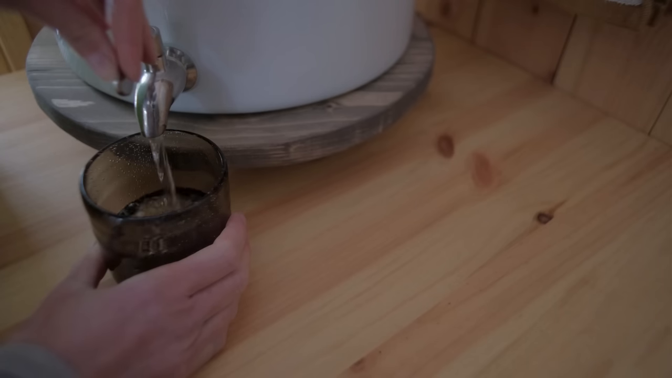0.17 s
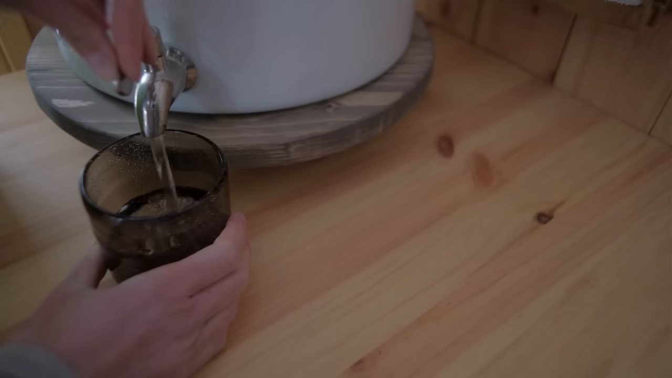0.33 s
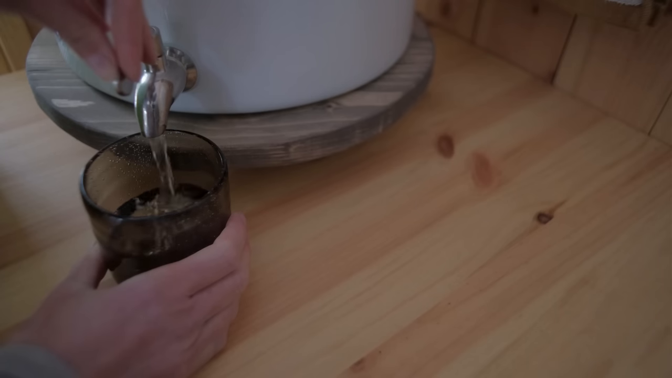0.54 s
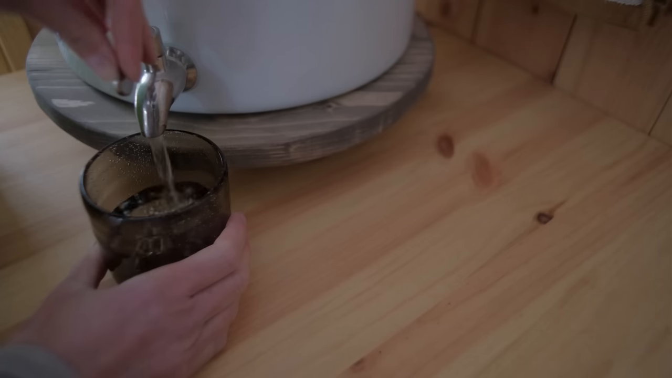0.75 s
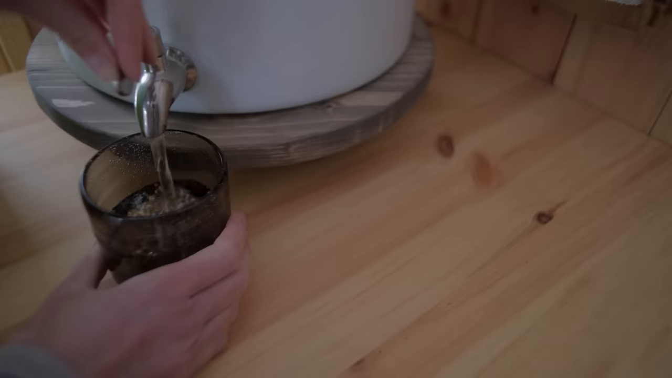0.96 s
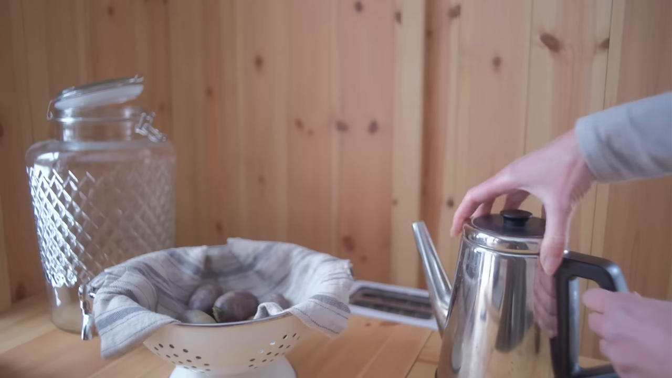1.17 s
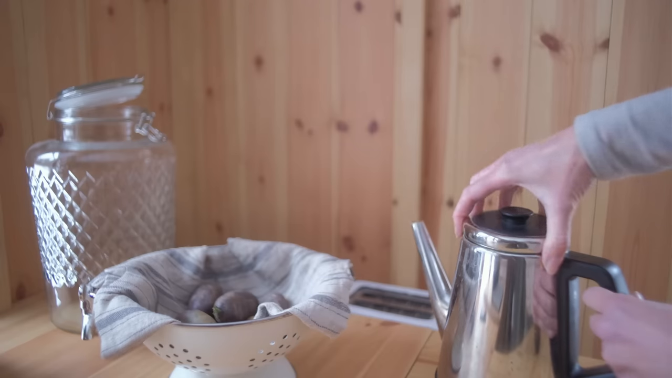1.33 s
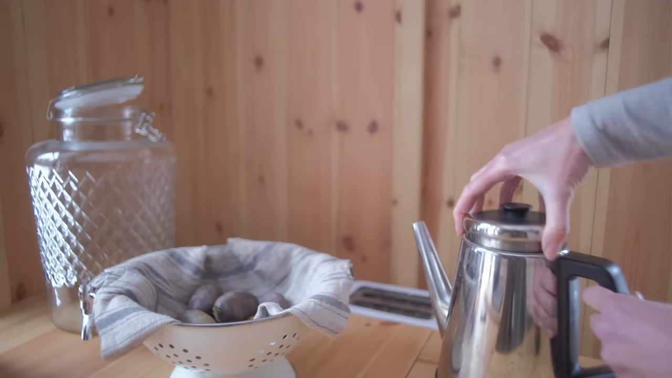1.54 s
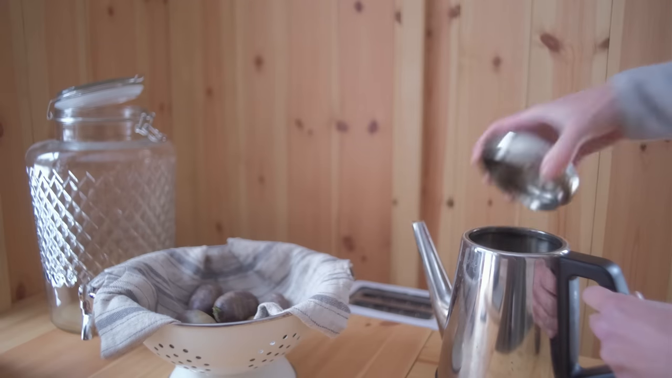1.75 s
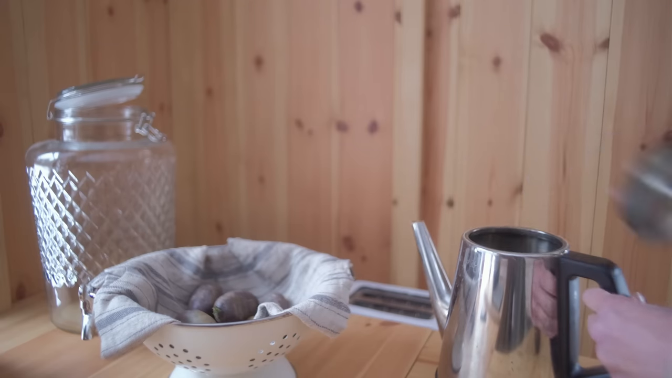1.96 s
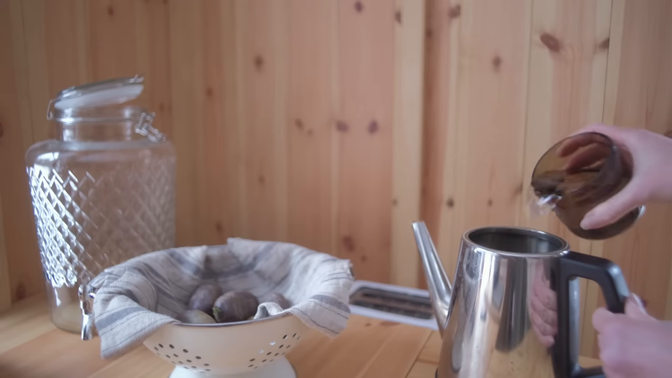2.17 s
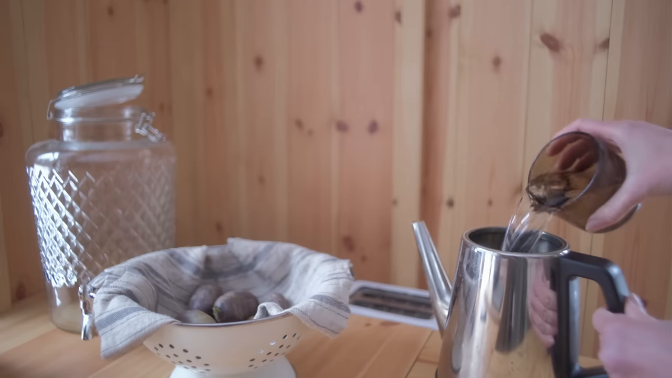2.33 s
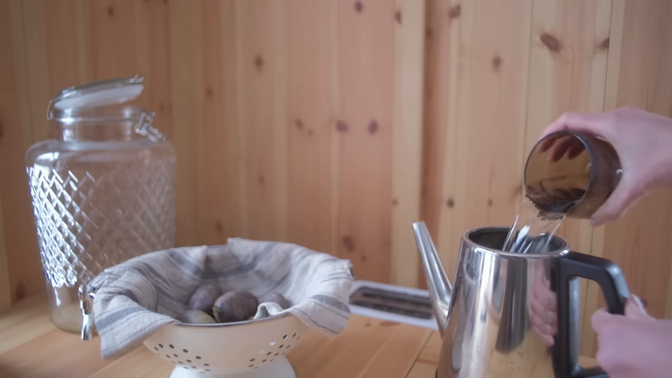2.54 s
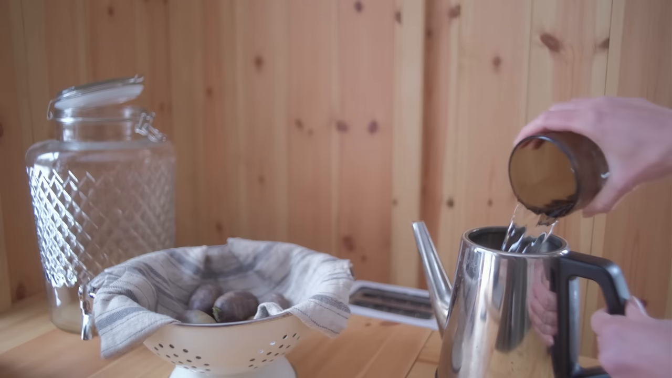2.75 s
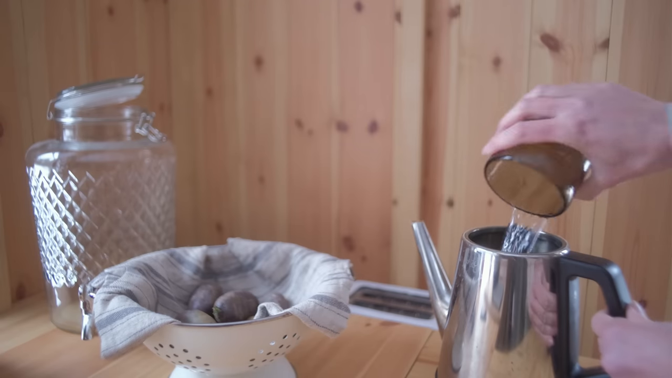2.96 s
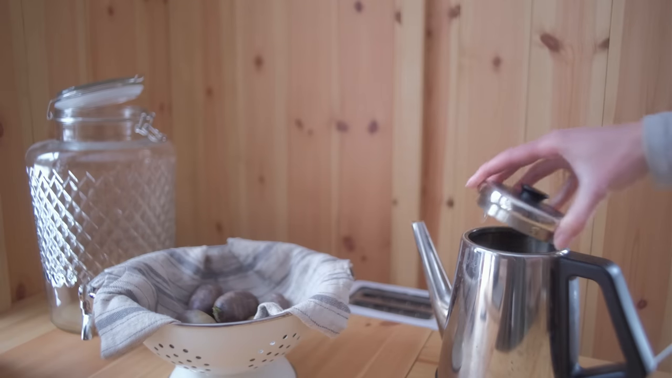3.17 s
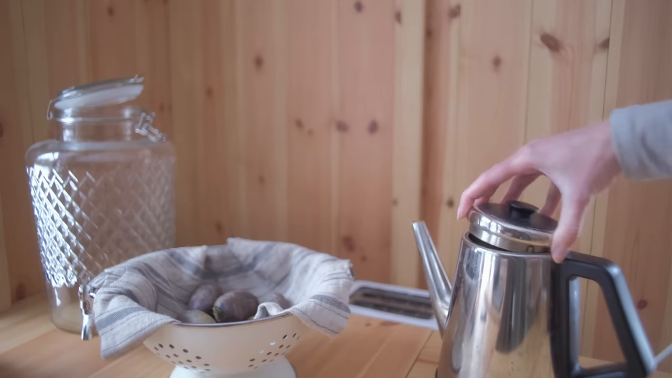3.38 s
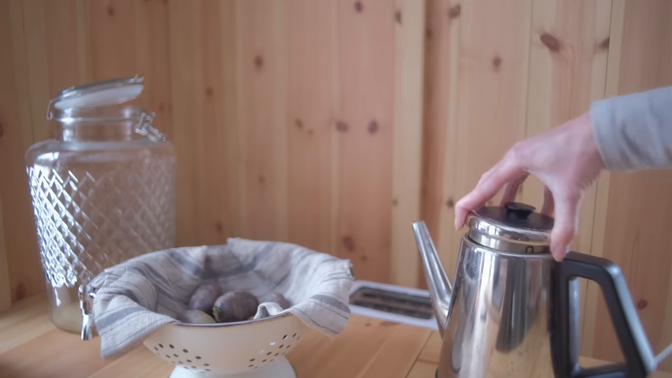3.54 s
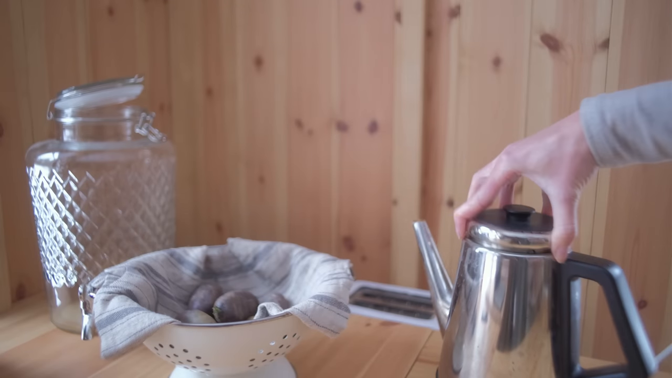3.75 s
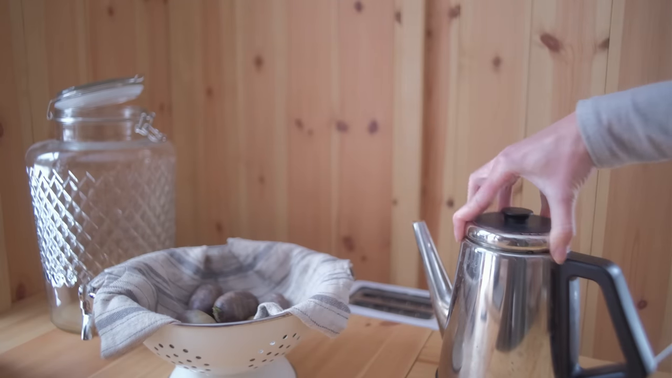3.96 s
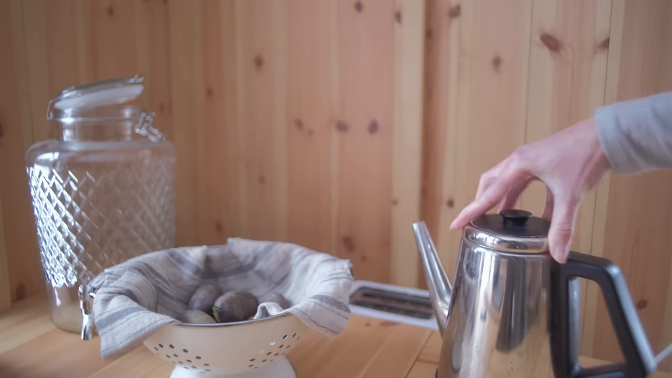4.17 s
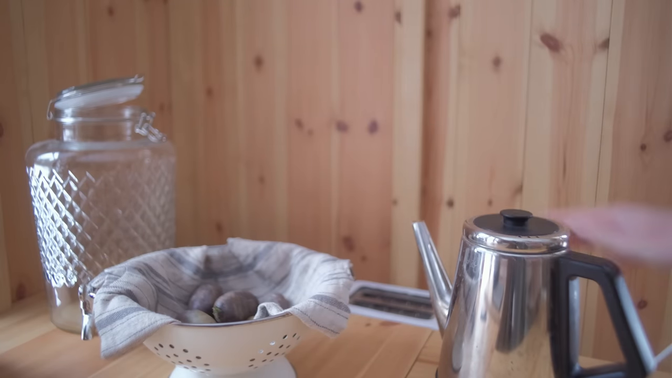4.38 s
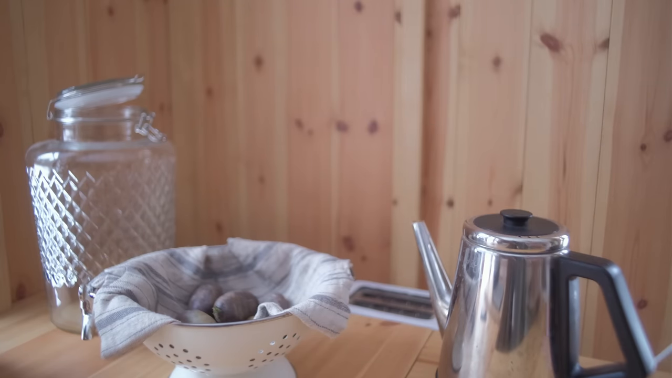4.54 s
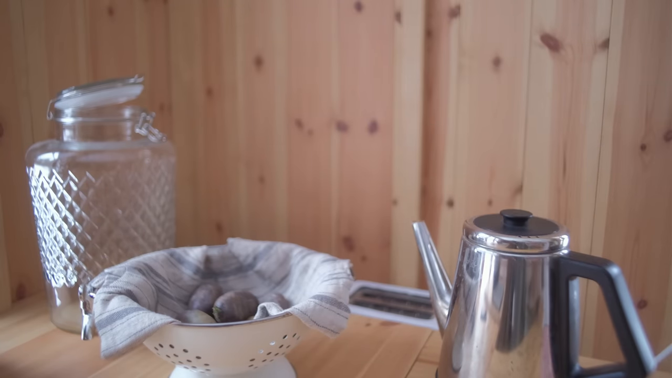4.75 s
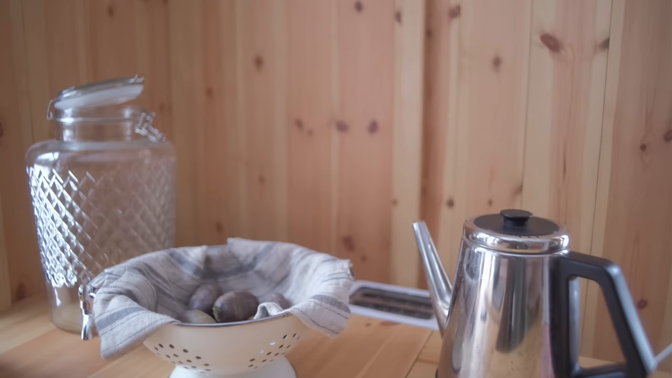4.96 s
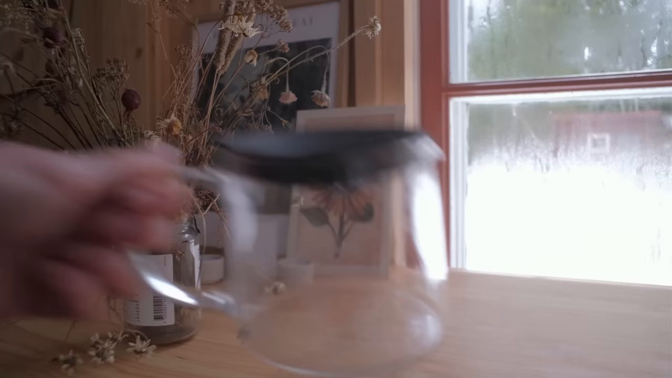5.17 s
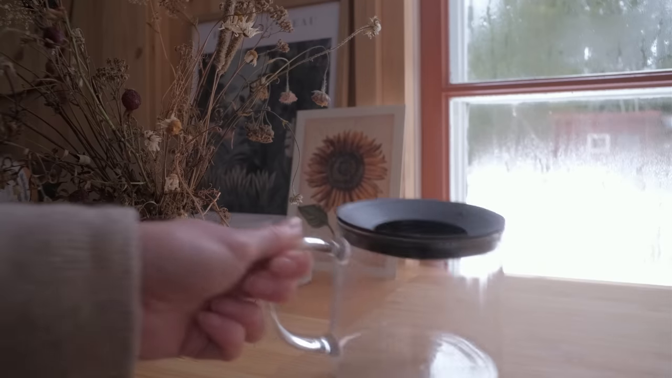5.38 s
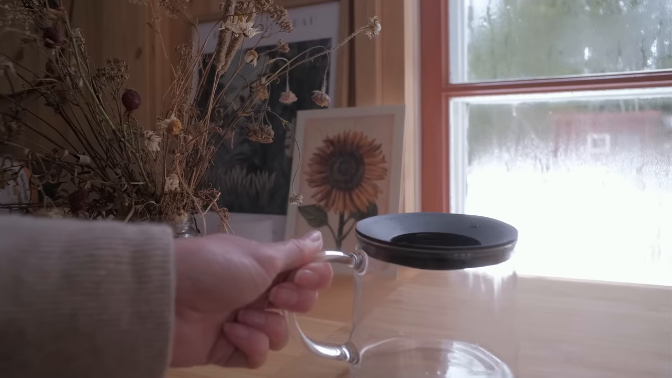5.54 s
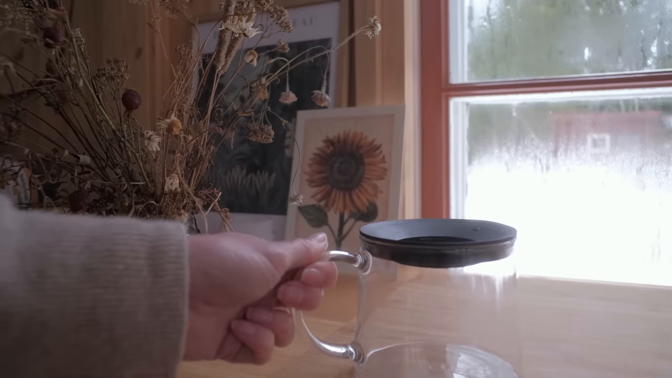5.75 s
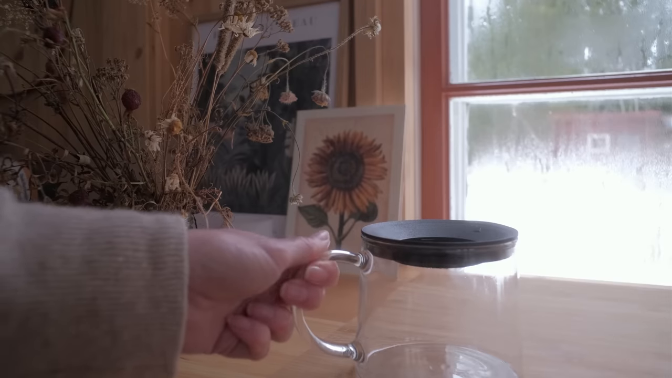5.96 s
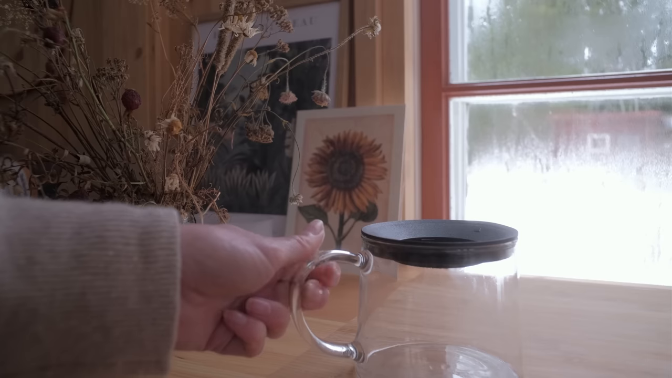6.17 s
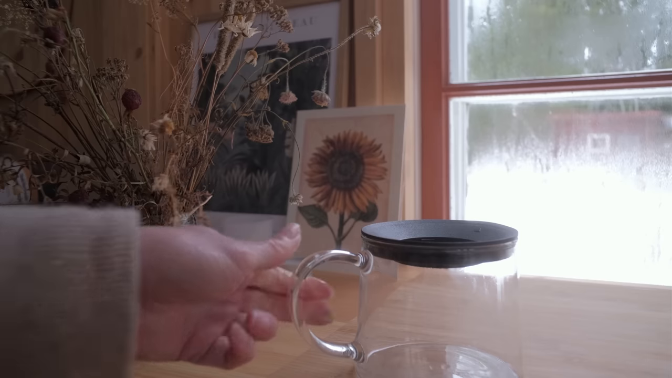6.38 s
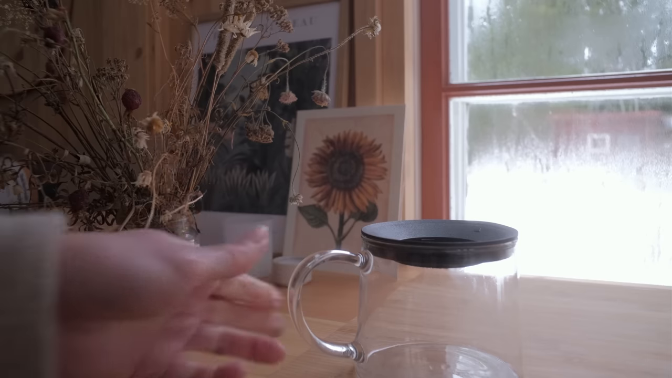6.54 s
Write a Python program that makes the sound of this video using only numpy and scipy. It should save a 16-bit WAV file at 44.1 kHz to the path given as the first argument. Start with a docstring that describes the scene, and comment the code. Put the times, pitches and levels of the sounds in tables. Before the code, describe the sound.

Close kitchen sounds: tap trickle with ringing plops, short pour into a metal kettle, hard lid clank, plastic click, then steady simmering hiss and wooden thud.

```python
"""Four scenes in a wooden kitchen, cut together. First a thin tap stream fills a glass: plops, ringing gurgle, fizz.
Then a steel kettle's lid scrapes off and water is poured in: splash, gulps, an air column rising in pitch.
Then the lid is knocked and pressed back on (struck steel modes, a sinking air note) and a plastic switch snaps.
Last a jug is set down on the wooden top while heating water hisses. Quiet air noise lies under all four."""
import sys
import numpy as np
from scipy import signal
from scipy.fft import rfft, irfft, next_fast_len
from scipy.io import wavfile
from scipy.ndimage import uniform_filter1d

SR = 44100
rng = np.random.default_rng(int(sys.argv[2]) if len(sys.argv) > 2 else 0)


def generate_wav(signal):
    """Clip the signal to [-1, 1] and save it as 16-bit WAV at the path in sys.argv[1]."""
    frames = np.transpose(np.atleast_2d(signal))
    scaled = np.clip(frames, -1, 1) * 32767
    pcm = np.round(scaled).astype(np.int16)
    wavfile.write(sys.argv[1], SR, pcm)


N = 291501

# bubbles in the glass [t/s, level/dB, f/Hz, t60/s]
PLOPS = [(0.014, -23, 664, 0.033), (0.056, -28, 659, 0.12), (0.079, -24.5, 630, 0.062),
         (0.147, -27, 608, 0.043), (0.175, -24, 603, 0.071), (0.199, -30.5, 603, 0.058),
         (0.267, -18, 2290, 0.0083), (0.273, -28, 1480, 0.06), (0.334, -27.5, 572, 0.072),
         (0.367, -21.5, 610, 0.049), (0.394, -19.5, 603, 0.022), (0.445, -24.5, 675, 0.031),
         (0.479, -25.5, 573, 0.086), (0.502, -36, 560, 0.042), (0.539, -33, 1087, 0.15),
         (0.552, -28.5, 584, 0.075), (0.617, -30.5, 1125, 0.053), (0.632, -26.5, 477, 0.033),
         (0.707, -35.5, 1175, 0.14), (0.739, -35, 653, 0.046), (0.779, -22.5, 533, 0.026),
         (0.799, -23, 1260, 0.032), (0.85, -35, 530, 0.071), (0.869, -28.5, 1480, 0.036),
         (0.899, -44, 1350, 0.082), (0.979, -23.5, 603, 0.058), (1.025, -26.5, 1254, 0.075),
         (1.039, -28.5, 1160, 0.082), (1.072, -54, 1240, 0.045)]
# air and wall modes of the glass [f/Hz, base width/Hz, relative level/dB]
GLASS_MODES = [(306, 30, -4.5), (603, 59, -1.5), (1160, 71, -0.5), (1480, 7.5, -8), (1950, 48, -13),
               (3390, 65, -26)]
# fizz spectrum [f/Hz, relative density/dB per Hz]
FIZZ_SPECTRUM = [(59, -48), (100, -2.5), (308, 2), (398, -0.5), (608, 0.5), (836, -53), (1310, 5),
                 (1720, -16), (14400, -39), (16000, -32)]
FIZZ_DB = -47.5
# steady level; kick relative to each plop (gurgle) or drop (small bubbles); decay of the kick
GURGLE_DB, GURGLE_KICK_DB, GURGLE_T60_S = -67, -10.5, 0.11
BUBBLES_DB, BUBBLES_KICK_DB, BUBBLES_T60_S = -56, -14.5, 0.068
STIR_RISE_S = 0.0021


def tap():
    """Plops stir a gurgle that rings the glass; drops stir small bubbles; fizz is dense filtered clicks."""
    out = np.zeros(N)
    size = round(CUTS[1] * SR) + 400
    for t0, *plop in PLOPS:
        add(out, t0, bubble(*plop))

    plop_s, plop_db = np.transpose(PLOPS)[:2]
    drop_s, drop_db = np.transpose(DROPS)[:2]
    gurgle_kicks = swells(plop_s, plop_db + GURGLE_KICK_DB, STIR_RISE_S, GURGLE_T60_S)[:size]
    bubble_kicks = swells(drop_s, drop_db + BUBBLES_KICK_DB, STIR_RISE_S, BUBBLES_T60_S)[:size]
    gurgle_level = amp(GURGLE_DB) + gurgle_kicks
    bubble_level = amp(BUBBLES_DB) + bubble_kicks

    drive = grains(size, 400, 5.6)
    gurgle = np.zeros(size)
    for hz, width_hz, db in GLASS_MODES:
        mode = resonate(resonate(drive, hz, 1.63 * width_hz), hz, 390)
        gurgle += amp(db) * evened(mode)
    add(out, 0, gurgle_level * evened(gurgle))
    add(out, 0, bubble_level * swarm(size, 1185, 5870, 360, cycles=36.5))
    add(out, 0, bubble_level * amp(-26) * swarm(size, 4400, 16400, 200, cycles=36.0, count=12))
    add(out, 0, amp(FIZZ_DB) * colour(grains(size, 6000, 2.4), FIZZ_SPECTRUM))
    return out


# flow from glass into kettle [t/s, splash level/dB]
FLOW = [(2.35, -80), (2.362, -50), (2.41, -37), (2.478, -50), (2.644, -55.5), (2.70, -51.5), (2.80, -47),
        (2.85, -56.5), (2.91, -45), (3.04, -57.5)]
# gulps of the poured water [t/s, level/dB, f/Hz, t60/s]
GULPS = [(2.4, -24.5, 518, 0.22), (2.414, -26, 526, 0.089), (2.408, -24.5, 1753, 0.06),
         (2.462, -35, 1800, .04), (2.534, -27.5, 510, 0.071), (2.659, -33, 3140, 0.023),
         (2.691, -30.5, 2640, 0.045), (2.732, -27, 1556, 0.04), (2.921, -28, 1080, 0.062),
         (2.799, -18.5, 573, 0.044), (2.801, -32, 2590, .04), (2.829, -26.5, 706, 0.05),
         (2.863, -25.5, 2433, 0.08), (2.892, -22.5, 3380, 0.026), (2.917, -21.5, 668, 0.041),
         (2.949, -28, 717, 0.039)]
# spectra [f/Hz, relative density/dB per Hz]
SPLASH_SPECTRUM = [(410, -34), (700, -19), (899, -16), (1100, -9), (1240, -47), (1770, 11.5), (2160, 8),
                   (2520, 6), (3060, -2), (3460, 5.5), (7000, -11), (9100, -61), (15400, -120)]
SPRAY_SPECTRUM = [(2940, -22), (5000, 1), (7670, -0.5), (8620, 1.5), (13200, -8), (16000, -18)]
# spray and boom levels at full flow; slopes in dB per dB of flow
FULL_FLOW_DB, SPRAY_DB, SPRAY_SLOPE, BOOM_DB, BOOM_SLOPE = -36.5, -33, 1.4, -55, 1
CLUMP_DB, CLUMP_PER_S = 4.5, 45  # lumps in the stream: rms swing; smoothing rate
# the air column climbs FILL_S after the flow starts; level relative to the low gulps that excite it
COLUMN_HZ, FILL_S, FILL_HZ_PER_S, COLUMN_DB, COLUMN_T60_S = 521, 0.19, 500, -20, 0.37
FROTH_DB, FROTH_WIDTH = -3, 0.3  # relative to the gulp; share of its pitch


def pour():
    """A lumpy stream splashes and rings the steel, with spray, bubbles, gulps and a rising air column."""
    out = np.zeros(N)
    start_s, (flow_db,) = unroll(FLOW)
    size = len(flow_db)
    lump = round(SR / CLUMP_PER_S)
    lumps = uniform_filter1d(uniform_filter1d(rng.standard_normal(size), lump), lump)
    splash_db = flow_db + CLUMP_DB * evened(lumps)
    below_db = splash_db - FULL_FLOW_DB

    drive = grains(size, 2500, 2.4)
    ringing = np.zeros(size)
    for hz, db, _ in STEEL_MODES:
        if hz > 1200:
            ringing += amp(db) * resonate(drive, hz, 140)
    splash = colour(drive, SPLASH_SPECTRUM) + 0.85 * evened(ringing)
    spray = colour(grains(size, 3000, 4.3), SPRAY_SPECTRUM)
    boom = evened(resonate(resonate(drive, 83, 50), 84, 50))
    add(out, start_s, amp(splash_db) * splash)
    add(out, start_s, amp(SPRAY_DB + SPRAY_SLOPE * below_db) * spray)
    add(out, start_s, amp(splash_db) * swarm(size, 915, 5150, 500, cycles=17.6))
    add(out, start_s, amp(BOOM_DB + BOOM_SLOPE * below_db) * boom)

    low_gulps = [row for row in GULPS if row[2] < 1000]
    gulp_s, gulp_db = np.transpose(low_gulps)[:2]
    column_level = swells(gulp_s, gulp_db + COLUMN_DB, 0.0071, COLUMN_T60_S)[round(start_s * SR):][:size]
    column_hz = COLUMN_HZ + FILL_HZ_PER_S * np.maximum(np.arange(size) / SR - FILL_S, 0)
    add(out, start_s, column_level * evened(resonate(grains(size, 510, 1.0), column_hz, 55)))

    t = np.arange(4000) / SR
    for t0, db, hz, t60 in GULPS:
        add(out, t0, bubble(db, hz, t60, glide=0.06, rise_s=0.0024))
        width_hz = FROTH_WIDTH * hz
        froth = evened(resonate(resonate(rng.standard_normal(4000), hz, width_hz), hz, width_hz))
        froth_level = amp(db + FROTH_DB - 60 * t / (0.92 * t60)) * np.minimum(t / 0.0015, 1)
        add(out, t0, froth_level * froth)
    return out


# lid dragged over the rim [t/s at peak, level/dB, treble level/dB, rise/s, t60/s]
SCRAPES = [(1.321, -50, -57, 0.081, 0.21), (1.522, -40.5, -62, 0.031, 0.45),
           (1.582, -37.5, -52, 0.058, 0.11), (1.682, -59, -75, .01, 0.2), (1.95, -66, -85, .01, 0.43),
           (2.131, -58, -50, .003, 0.076), (3.277, -35.5, -46, 0.021, 0.43),
           (3.337, -22, -42, 0.0046, 0.043), (3.6, -56.5, -80, 0.3, 0.34), (3.784, -34, -50, 0.019, 0.16),
           (3.94, -58, -80, .05, 0.9), (4.033, -33.5, -50, 0.0027, 0.31), (4.081, -43, -60, 0.079, 0.11)]
# scrape spectrum [f/Hz, relative density/dB per Hz]
SCRAPE_SPECTRUM = [(150, -31), (250, -3), (493, -4.5), (640, -20.5), (1100, -3), (1670, -9), (2620, -9.5),
                   (2910, -12.5), (4050, -12), (7980, -15.5), (13700, -28.5), (16000, -32)]
# hand and kettle shifting [t/s at peak, dull rustle/dB, base/dB, worktop boom/dB, t60/s]
SHIFTS = [(1.322, -68, -60, -57, 0.27), (1.38, -59, -50.5, -62, 0.17), (1.52, -83, -48, -58, 0.26),
          (1.584, -76, -40, -44.5, 0.067), (1.682, -68, -63, -74, 0.31), (2.06, -72, -70, -58, 0.17),
          (2.2, -86, -82, -72, .3), (3.277, -39, -41.5, -39.5, 0.097), (3.365, -41, -51.5, -50, 0.15),
          (3.52, -63, -64, -58, 0.55), (3.783, -51, -51, -47.5, 0.49), (3.93, -71, -48, -61, 0.37),
          (3.982, -50.5, -43, -65, .06), (4.076, -41, -43, -39.5, 0.16), (4.267, -55, -59.5, -61, 0.98)]
SHIFT_RISE_S = 0.049
# kettle air booms as the lid leaves or meets the mouth [t/s, level/dB, f/Hz, t60/s]
PUFFS = [(1.68, -34, 407, 0.057), (3.337, -22.5, 434, 0.17), (3.46, -43, 335, 0.17)]
# air note while the lid closes the mouth; flutter is the rms swing as the lid rocks
CLOSE_S, SHUT_S, OPEN_HZ, SHUT_HZ, SINK_S = 3.36, 4.07, 454, 233, 0.15
CAVITY_DB, FLUTTER_DB = -54.5, 4.5


def lid():
    """Friction clicks drive the steel; handling rumbles low; the air note sinks as the mouth closes."""
    drive = grains(N, 4000, 2.4)
    ringing = np.zeros(N)
    for hz, db, _ in STEEL_MODES:
        ringing += amp(db) * resonate(drive, hz, 87)
    scrape = colour(drive, SCRAPE_SPECTRUM) + 0.11 * evened(ringing)
    treble = evened(high_pass(drive, 9000))
    peak_s, db, treble_db, rise_s, t60 = np.transpose(SCRAPES)
    out = swells(peak_s, db, rise_s, t60) * scrape
    out += swells(peak_s, treble_db, rise_s, t60) * treble

    peak_s, *levels_db, t60 = np.transpose(SHIFTS)
    bands = [(510, 330), (187.5, 54), (82, 25)]  # rustle, base, worktop: f/Hz, width/Hz
    for db, (hz, width_hz) in zip(levels_db, bands):
        rumble = evened(resonate(resonate(drive, hz, width_hz), hz, width_hz))
        out += swells(peak_s, db, SHIFT_RISE_S, t60) * rumble

    for t0, *puff in PUFFS:
        add(out, t0, bubble(*puff, glide=-0.0026, rise_s=0.0017))

    t = np.arange(0, SHUT_S - CLOSE_S, 1 / SR)
    cavity_hz = SHUT_HZ + (OPEN_HZ - SHUT_HZ) * np.exp(-t / SINK_S)
    flutter = evened(uniform_filter1d(rng.standard_normal(len(t)), 900))
    cavity = evened(resonate(rng.standard_normal(len(t)), cavity_hz, 40))
    add(out, CLOSE_S, amp(CAVITY_DB + FLUTTER_DB * flutter) * cavity)
    return out


# modes [f/Hz, relative level/dB, base t60/s]: kettle and lid; plastic base; jug on the wooden top
STEEL_MODES = [(430, -21.5, 0.4), (447, -18, 0.4), (585, -3, 0.098), (664, 3, 0.12), (741, -1.5, .12),
               (750, 0, 0.062), (877, 8.5, 0.079), (1020, -14, 0.12), (1100, -4, 0.15), (1346, -8, 0.15),
               (1512, -5, 0.31), (1705, 3.5, 0.17), (2154, -2, 0.11), (2728, -6, 0.3), (2616, 2.5, 0.19),
               (3300, -10, 0.068), (4520, -32.5, 0.071), (5230, -18, 0.21), (6960, -14, 0.095),
               (8850, -14, 0.13), (9920, -28, .08)]
SWITCH_MODES = [(786, -2, .15), (1004, -7, 0.2), (1056, -4, 0.16), (1071, 5, 0.16), (1144, -10, .12),
                (1200, -17, 0.12), (1707, 3.5, 0.16), (1820, -2, 0.12), (2255, -4, 0.11),
                (2460, -1.5, 0.13), (3470, -4, 0.062), (4250, -11, 0.051)]
TABLE_MODES = [(380, -3, 0.053), (476, 9.5, 0.16), (560, 11, 0.1), (634, 11, 0.093), (733, 13.5, 0.083),
               (880, 10.5, 0.11), (985, 11.5, 0.081), (1086, 10.5, 0.07), (1183, 7.5, 0.08),
               (1461, 8.5, 0.091), (1515, 6, 0.07), (1800, 5.5, 0.047)]
# blows on steel, switch, table [t/s, level/dB, bass/dB, low mid/dB, treble/dB, factor on t60];
# bass, low mid and treble are relative to the blow
BLOWS = [(1.251, -52, -19, -21, -18, 0.64), (1.314, -41.5, -3, -9, -10, 0.69),
         (2.361, -49, -3, -19, 5, 0.6), (3.156, -4.5, -27, 1, -8, 0.36), (3.263, -27, -13, -1, 3.5, 0.58),
         (3.338, -11, -43, -20, -35, 0.27), (3.666, -45, -11, -22, 1, 0.19), (3.776, -33.5, -6, 1, 4, 0.27),
         (4.031, -23.5, -12, -1, -34, 0.2), (4.074, -23.5, -1, -15, -33, 0.25),
         (4.264, -41.5, 0, 25, -38, 0.52), (4.423, -55, -11.5, 3, -16, 0.28)]
SNAPS = [(4.806, -41.5, -30, -29, -1.5, 0.84), (4.854, -32.5, -34, -48, -8.5, 0.79),
         (4.874, -13, -28, -49, -12, 0.34)]
KNOCKS = [(5.522, -4, -26, -8.5, -42, 0.33)]


def strike(events, modes, rise_s, chatter_s):
    """A blow and its short chatter ring the modes, with a bright tick and a low push."""
    out = np.zeros(N)
    t = np.arange(16000) / SR
    hz, mode_db, t60 = np.transpose(modes)[:, :, None]
    # each mode beats with a weaker partner 2.5 % higher
    beating = np.sin(2 * np.pi * hz * t) + 0.41 * np.sin(2 * np.pi * 1.025 * hz * t)
    contact = 1 - np.exp(-t / rise_s)
    for t0, db, bass_db, mid_db, treble_db, ring in events:
        tilt = [(400, mid_db), (560, mid_db), (850, 0.0092), (3000, 0.0037), (5000, treble_db + 12.5)]
        place_db = 1.4 * rng.standard_normal(hz.shape)  # the point of contact favours some modes
        decay_db = -60 * t / (np.clip(t60, 0.02, 0.6) * ring)
        rings = amp(mode_db + place_db + read(tilt, hz) + decay_db) * beating
        chatter = 0.05 * rng.standard_normal(len(t)) * np.exp(-t / chatter_s)
        chatter[0] += 1  # the blow itself
        body = signal.fftconvolve(rings.sum(0) * contact, chatter)[:len(t)]
        body = high_pass(body, 340)
        click = high_pass(resonate(rng.standard_normal(len(t)), 6500, 10000), 820)
        tick = amp(treble_db - 1.5) * click * np.exp(-t / 0.0077)
        push = amp(bass_db) * np.sin(2 * np.pi * 160 * t) * (t / 0.0038) * np.exp(-t / 0.0041)
        add(out, t0, amp(db) * (body / abs(body).max() + tick + push))
    return out


# drops bursting at the surface, in glass then kettle [t/s, nominal level/dB, centre f/Hz]
DROPS = [(0.014, -22.5, 14300), (0.0353, -32, 9900), (0.055, -31, 7060), (0.0694, -28, 3390),
         (0.1065, -43, 7490), (0.1393, -31, 15000), (0.1955, -29.5, 5000), (0.201, -31, 13400),
         (0.2345, -24.5, 6700), (0.293, -31, 4400), (0.3345, -38, 4680), (0.3556, -39, 4770),
         (0.3661, -43, 3380), (0.3837, -32.5, 13000), (0.3937, -32, 4760), (0.407, -30.5, 3970),
         (0.4455, -19, 7040), (0.4794, -37, 3970), (0.5, -49, 3050), (0.553, -22, 3390),
         (0.6176, -26.5, 14900), (0.652, -22.5, 14200), (0.7047, -25, 7800), (0.7356, -27.5, 2900),
         (0.7734, -27, 5200), (0.781, -26.5, 8900), (0.799, -28, 3000), (0.83, -38, 9700),
         (0.852, -20.5, 5030), (0.9033, -44, 3080), (0.943, -38, 10700), (0.963, -37, 4270),
         (0.9806, -20.5, 9100), (0.999, -28.5, 13000), (1.08, -33, 14300), (1.1115, -31, 2830),
         (2.3616, -47, 3860), (2.4026, -27, 4520), (2.579, -40, 3740), (2.614, -42, 4100),
         (2.681, -32.5, 3360), (2.7238, -22.5, 6640), (2.7964, -33, 3320), (2.8627, -30, 3070),
         (2.8953, -41, 3440)]
TINY_DB, TINY_SPREAD_DB, TINY_PER_S = -45, 4.5, 45  # further small drops at random times


def splats():
    """Each drop is a tick with a puff of spray around its pitch; small random drops fill in."""
    out = np.zeros(N)
    t = np.arange(1500) / SR
    tiny = []
    for start, end in [(0, CUTS[1]), (FLOW[0][0], CUTS[2])]:
        for u, v, w in rng.random((int(TINY_PER_S * (end - start)), 3)):
            db = TINY_DB - TINY_SPREAD_DB * np.log(v + 0.01)
            tiny.append((start + (end - start) * u, db, 2000 * 7 ** w))
    decay = np.exp(-t / 0.0027) + 0.1 * np.exp(-t / 0.0046)
    for t0, db, hz in DROPS + tiny:
        noise = rng.standard_normal(1500)
        burst = evened(resonate(noise, hz, 1000)) + 0.9 * np.diff(noise, prepend=0)
        add(out, t0, amp(db - 8) * (hz / 5000) ** 0.15 * burst * decay)
    return out


# heating water [t/s, hiss level/dB]
SIMMER = [(4.9, -35), (5.3, -36.5), (5.6, -36), (5.9, -37), (6.25, -36.5), (6.62, -36)]
# hiss spectrum [f/Hz, relative density/dB per Hz]
HISS_SPECTRUM = [(24, -62), (40, -42), (130, -18.5), (402, -26), (542, -10.5), (646, -15), (751, -3),
                 (965, -5), (1240, -9), (1340, -9), (1810, -11), (3060, -13.5), (3930, -22.5),
                 (7000, -35.5), (13800, -48.5), (16000, -78)]
# water and steel colouring the hiss [f/Hz, width/Hz, relative level/dB]
HISS_MODES = [(735, 44, 5), (1293, 26, -13.5)]
SPREAD_HZ = 2660  # treble above this also reaches each port by its own way


def simmer():
    """Thousands of tiny steam bubbles collapse and ring water and steel; returns near and scattered parts."""
    out = np.zeros((3, N))
    start_s, (db,) = unroll(SIMMER)
    for part in out:
        drive = grains(len(db), 9000, 1.0)
        ringing = np.zeros(len(db))
        for hz, width_hz, mode_db in HISS_MODES:
            ringing += amp(mode_db) * resonate(drive, hz, width_hz)
        hiss = evened(colour(drive, HISS_SPECTRUM) + 0.5 * evened(ringing))
        add(part, start_s, amp(db) * hiss)
    return out[0], high_pass(out[1:], SPREAD_HZ)


# reverberation [f/Hz, t60/s, relative level/dB]
WALLS = [(149, 0.12, 6), (603, 0.3, 1), (2504, 0.31, -3), (6760, 0.22, -2), (13000, 0.14, 2)]
# likeness of the room at both ports [f/Hz, correlation/-1..1]
LIKENESS = [(50, 1), (150, 0.95), (600, 0.78), (1500, 0.25), (3000, 0.21)]


def room():
    """Sparse taps of random sign, each band dying at its own speed; the bass is alike at both ports."""
    taps = np.zeros((2, SR // 2))
    grid = np.arange(120, SR // 2 - 20, 20)
    at = grid + rng.integers(0, 20, (2, len(grid)))
    np.put_along_axis(taps, at, rng.choice([-1., 1.], at.shape), 1)
    hz, t, (a, b) = signal.stft(taps, SR, nperseg=512)
    same = np.clip(read(LIKENESS, hz), -1, 1)[:, None]
    walls = np.array(WALLS)
    t60 = read(walls[:, [0, 1]], hz)[:, None]
    wall_db = read(walls[:, [0, 2]], hz)[:, None]
    ports = np.array([a, same * a + np.sqrt(1 - same ** 2) * b])
    tail = signal.istft(ports * amp(wall_db - 60 * t / t60), SR, nperseg=512)[1]
    return tail / np.linalg.norm(tail[0])


# air noise spectrum [f/Hz, relative density/dB per Hz]
AIR_SPECTRUM = [(15, -33), (25, -4.5), (120, -9.5), (317, -16), (796, -16.5), (863, -20), (1040, -15),
                (1790, -24), (2280, -24.5), (2550, -22.5), (4030, -29), (10400, -35), (16000, -33.5)]
AIR_DB = -61


def air():
    """Steady filtered noise, almost independent at the two ports."""
    a, b = rng.standard_normal((2, N))
    return amp(AIR_DB) * colour(np.array([a, 0.03 * a + b]), AIR_SPECTRUM)


def bubble(db, hz, t60, glide=0.021, rise_s=0.00083):
    """A dying sine whose pitch glides: up as a bubble nears the surface, down if glide is negative."""
    t = np.arange(round(np.clip(t60, 0.002, 0.4) * SR)) / SR
    turns = np.cumsum(hz * (1 + glide * t / t[-1])) / SR
    return amp(db - 60 * t / t60) * (1 - np.exp(-t / rise_s)) * np.sin(2 * np.pi * turns)


def swarm(size, low_hz, high_hz, per_s, cycles, count=24):
    """Many small bubbles, each size with its own random train; big ones are louder; rms 1."""
    out = np.zeros(size)
    for hz in np.geomspace(low_hz, high_hz, count):
        one = bubble(0, hz, cycles / hz, glide=0.76, rise_s=0.22 / hz)
        train = grains(size, per_s / count, 2.0)
        out += signal.oaconvolve(train, one)[:size] * (hz / low_hz) ** -0.3
    return evened(out)


def grains(size, per_s, spread_db):
    """Sparse clicks of random sign, a few of them large; rms 1."""
    chosen = rng.random(size) < per_s / SR
    sign = rng.choice([-1., 1.], size)
    return evened(chosen * sign * amp(spread_db * np.minimum(rng.exponential(1, size), 4)))


def swells(peak_s, db, rise_s, t60):
    """Level over time: each event rises to its peak and dies away; powers add."""
    power = np.zeros(N)
    for s, level_db, rise, fall in np.broadcast(peak_s, db, rise_s, t60):
        t = np.arange(-3 * rise, fall, 1 / SR)
        shape = amp(level_db) * np.where(t < 0, np.exp(2 * t / rise), amp(-60 * t / fall))
        skip = max(0, round((3 * rise - s) * SR) + 1)  # part before time zero
        add(power, s + t[skip], shape[skip:] ** 2)
    return np.sqrt(power)


def resonate(x, hz, width_hz):
    """Shifts the curve hz down to zero, smooths, and shifts back: a resonance of gain 1."""
    turn = np.exp(2j * np.pi * np.cumsum(hz * np.ones(len(x))) / SR)
    r = np.exp(-np.pi * width_hz / SR)
    return 2 * (turn * signal.lfilter([1 - r], [1, -r], x / turn + 1e-18)).real


def colour(x, spectrum):
    """Gives x the spectrum, rms 1."""
    size = next_fast_len(x.shape[-1])
    gain = amp(read(spectrum, np.fft.rfftfreq(size, 1 / SR)))
    return evened(irfft(rfft(x, size) * gain, size)[..., :x.shape[-1]])


def high_pass(x, hz):
    """Third-order Butterworth high-pass."""
    return signal.sosfilt(signal.butter(3, hz, "high", fs=SR, output="sos"), x)


def delay(x, samples):
    """Fractional delay as a phase slope."""
    size = next_fast_len(len(x))
    return irfft(rfft(x, size) * np.exp(-2j * np.pi * np.fft.rfftfreq(size) * samples), size)[:len(x)]


def amp(db):
    """dB to amplitude."""
    return 10 ** (np.asarray(db) / 20)


def evened(x):
    """Scales x to rms 1."""
    return x / np.sqrt(np.mean(x ** 2) + 1e-20)


def read(points, hz):
    """Interpolates a table over log frequency."""
    f, value = np.transpose(points)
    return np.interp(np.log(hz + 1), np.log(f + 1), value)


def unroll(rows):
    """Start time and sample-by-sample columns of a curve table."""
    s, *columns = np.transpose(rows)
    t = np.arange(s[0], s[-1], 1 / SR)
    return s[0], [np.interp(t, s, c) for c in columns]


def add(mix, s, sound):
    """Adds sound into mix from s seconds, clipped to its end."""
    part = mix[round(s * SR):][:len(sound)]
    part += sound[:len(part)]


# start of each scene [t/s]
CUTS = [0, 1.12, 3.036, 5.204]
# lag of the left port in each scene [samples]
LEFT_LAG = [-1.44, 2.5, 2.5, 5.5]
DROP_WET_DB = -4  # drops burst close by: less room than the rest


def scene():
    """Each part is heard from its own place, between two cuts, over the air noise."""
    kettle = lid() + strike(BLOWS, STEEL_MODES, 0.00074, 0.016)
    switch = strike(SNAPS, SWITCH_MODES, 0.0019, 0.0027)
    jug = strike(KNOCKS, TABLE_MODES, 0.00058, 0.0027)
    drops = splats()
    hiss, scattered = simmer()
    parts = [tap(), kettle + pour(), kettle + switch, hiss + jug]
    wet_db = [-5.0, -6.0, -3.5, -2.5]
    tail = room()
    out = np.zeros((2, N))
    t = np.arange(N) / SR
    for part, lag, db, start, end in zip(parts, LEFT_LAG, wet_db, CUTS, CUTS[1:] + [99]):
        inside = np.clip(np.minimum(t - start, end - t) / 0.004 + 0.5, 0, 1)  # 4 ms crossfade
        direct = np.array([delay(part + drops, lag), part + drops])
        sent = part + amp(DROP_WET_DB) * drops
        wet = signal.oaconvolve(sent[None], tail, axes=1)[:, :N]
        out += inside * (direct + amp(db) * wet)
    out += inside * scattered  # last part only
    return out + air()


EDGE_HZ = 15720


def record(dry):
    """Band limit: a steep low-pass at EDGE_HZ."""
    taps = signal.firwin(767, EDGE_HZ, window=("kaiser", 7), fs=SR)
    return signal.oaconvolve(dry, taps[None], "same", axes=1)


dry = scene()
out = record(dry)
generate_wav(out)
```